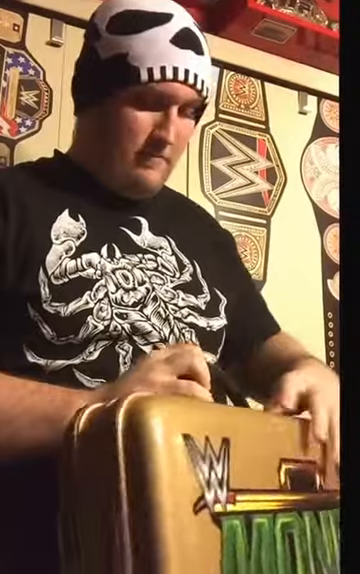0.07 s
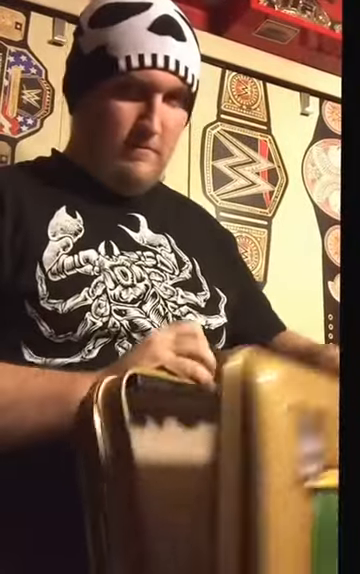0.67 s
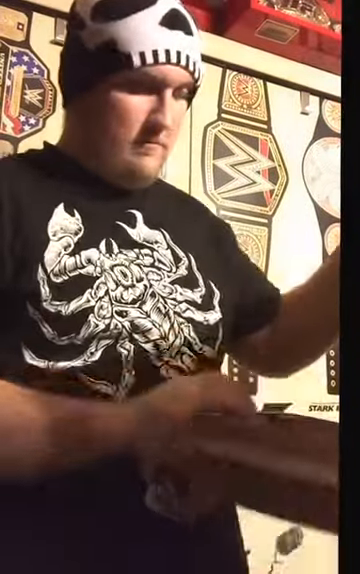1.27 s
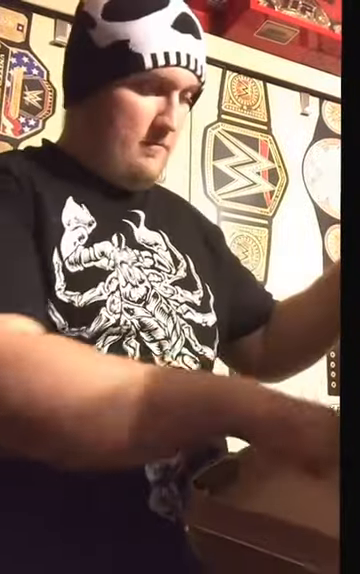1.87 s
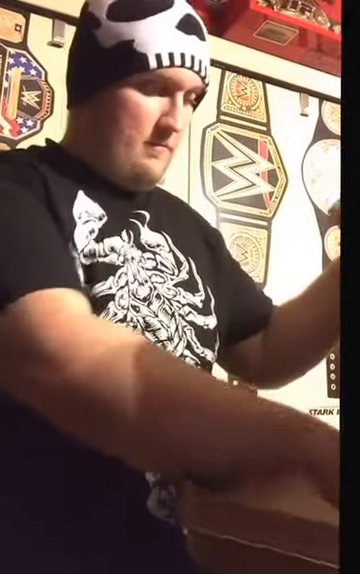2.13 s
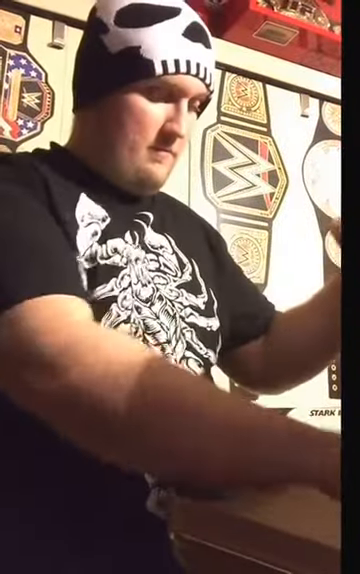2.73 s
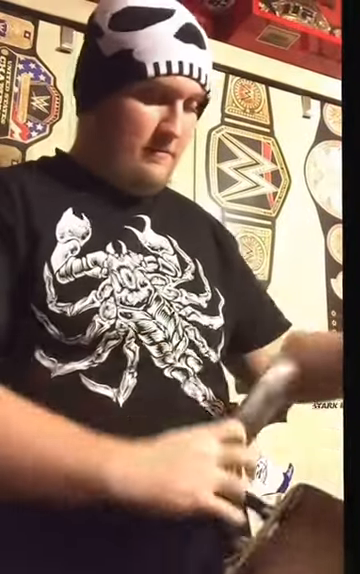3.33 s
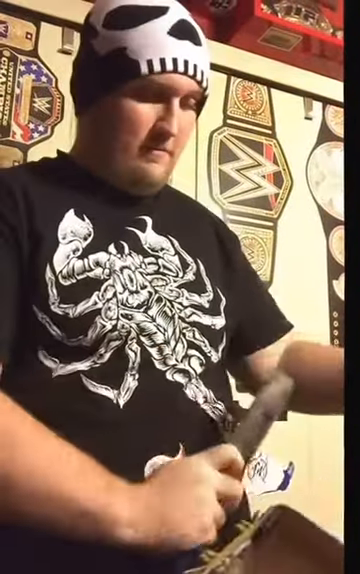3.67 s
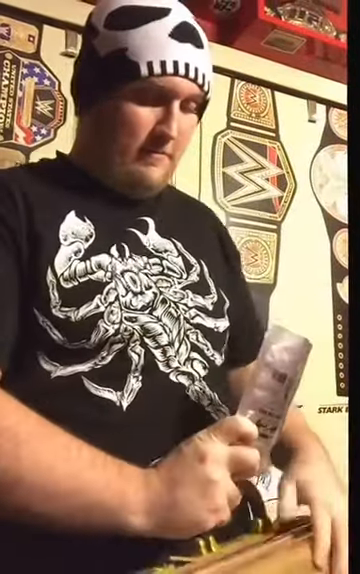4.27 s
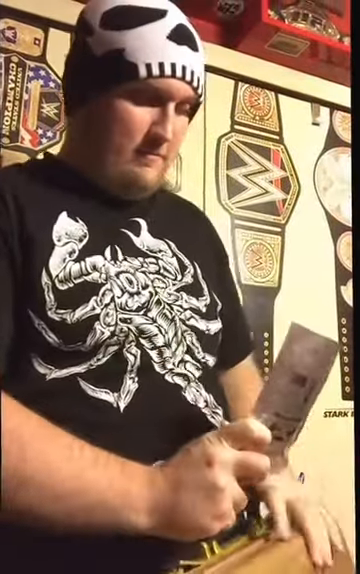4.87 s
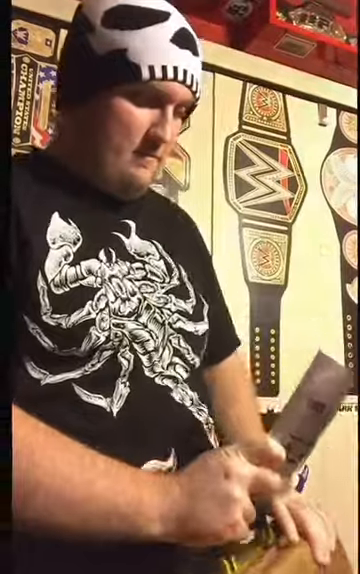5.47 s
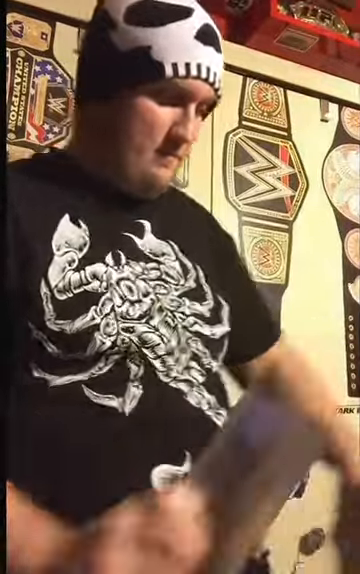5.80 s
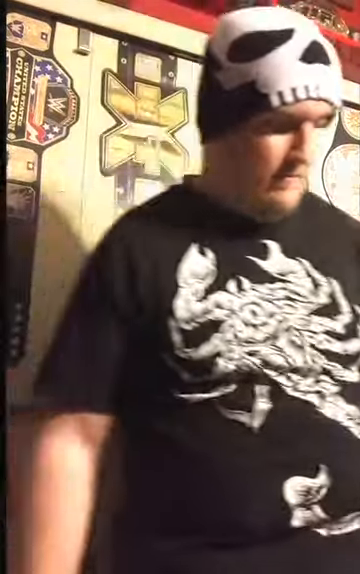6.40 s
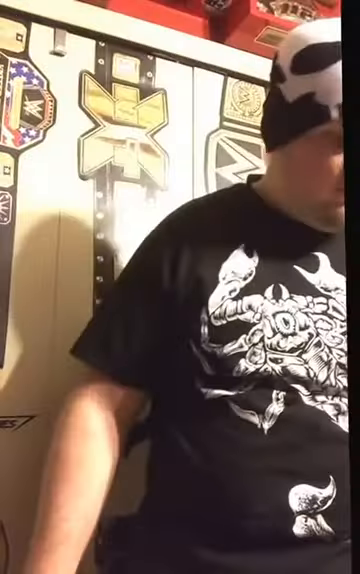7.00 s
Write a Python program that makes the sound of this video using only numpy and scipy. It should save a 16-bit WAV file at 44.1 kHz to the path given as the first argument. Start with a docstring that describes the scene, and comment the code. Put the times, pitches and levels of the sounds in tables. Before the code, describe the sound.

A hard briefcase is opened and a package scrapes out, followed by hollow knocks and sharp latch snaps in a quiet room.

```python
"""Unpacking a hard briefcase

A small, quiet room, heard from close by on a small microphone with little bass. The case is opened,
a boxed package slides out, the lid is shut, two latches snap home and the case is moved away.
Blows ring the hollow shell (thump) and its flat panels (clack). Friction makes the package scrape,
its edges tick as they catch and let go, and fast stick-slip gives thin squeaks."""
import sys
import numpy as np
from scipy import signal
from scipy.io import wavfile
from scipy.ndimage import uniform_filter1d

SR = 44100
rng = np.random.default_rng(int(sys.argv[2]) if len(sys.argv) > 2 else 0)


def transcribe(signal):
    """Save signal, clipped to [-1, 1], as a 16-bit WAV file at the path in sys.argv[1]."""
    frames = np.atleast_2d(signal).T
    limited = np.clip(frames, -1, 1)
    pcm = np.round(limited * 32767).astype(np.int16)
    wavfile.write(sys.argv[1], SR, pcm)


N = 310023
T = np.arange(N) / SR
RING_T = np.arange(12000) / SR  # seconds since a contact

# Hard knocks on the case, each led by a lighter touch whose levels are relative to the knock:
# start_s, thump_db, thump_hz, focus_db_per_octave, clack_db, clack_hz, snap_db,
# lead_s, touch_thump_db, touch_clack_db
KNOCKS = [(0.0005, -19.5, 315, 22, -29.5, 1020, -51.5, 0.012, -33.5, -22),
          (1.5, -38, 297, 19, -39.5, 2020, -48.5, 0.012, -2, -8),
          (2.483, -72, 320, 12, -42, 1700, -46, 0, -12, -8),
          (3.534, -45.5, 217, 9.6, -40, 1170, -73, .03, -1, -3),
          (3.9893, -19.5, 242, 24.5, -31.5, 1640, -39, .034, -25, -21),
          (4.2093, -17.5, 308, 21, -21.5, 1350, -41, 0.02, -9, -24),
          (5.1599, -11, 286.5, 9.3, -17.5, 1050, -26.5, .015, -16, -13),
          (5.703, -27.5, 472, 11.6, -30.5, 1300, -44.5, 0.0064, -4, -3),
          (6.572, -38.5, 330, 14, -51, 950, -62, 0.025, -30, -10)]
# Soft landings on the shell: start_s, thump_db, thump_hz, clack_db
BUMPS = [(.164, -58, 310, -64.5), (.213, -53.5, 330, -56), (.325, -57.5, 340, -59.5),
         (.564, -53.5, 308, -55.5), (3.785, -56, 290, -64), (4.142, -31, 330, -44.5),
         (4.483, -59.5, 224, -86), (4.596, -30, 243, -46.5), (4.62, -43.5, 234, -72),
         (4.749, -50, 240, -62), (4.805, -49.5, 270, -61), (4.894, -51.5, 254, -62),
         (4.931, -45.5, 250, -51), (4.944, -41, 248, -62), (5.177, -21.5, 150, -33.5),
         (5.859, -53, 290, -58.5), (6.175, -50, 271, -63), (6.242, -44, 334, -55.5),
         (6.641, -51, 407, -59.5), (6.791, -62, 360, -62.5)]
# Low modes of the shell; the lowest swell slowly with the room's air: pitch_hz, level_db, t60_s, rise_s
SHELL_MODES = [(135, -2, .16, .012), (152, -3, .19, .01), (181, -9, .12, .004), (214, -4, .18, .004),
               (245, -1, .18, .002), (264, 0, .16, .002), (301, 2, .14, .001), (338, -4, .13, .001),
               (368, -7, .14, .001), (430, -1, .14, .001), (479, -3, .14, .001), (532, -10, .14, .001),
               (590, -10, .12, .001)]
# Higher modes of the panels: pitch_hz, level_db
PANEL_MODES = [(663, -1), (757, 0), (885, -2), (975, -4), (1028, -1), (1342, -5), (1405, -4), (1472, -1),
               (1543, 2), (1680, -3), (1812, -4), (2002, -5), (2300, -4), (2785, -7)]
# Hum of the open lid: start_s, pitch_hz, level_db, t60_s
LID_MODE = (1.508, 151, -40, .56)
# Sliding strokes: fastest_s, rise_s, fall_s, scrape_gain_db, fizz_gain_db
STROKES = [(.82, .35, 0.19, -59.5, -67), (1.6, 0.1, 0.14, -69, -67), (1.85, 0.076, 0.11, -55.5, -61.5),
           (2.05, 0.032, 0.11, -56, -56), (2.127, 0.033, 0.055, -47.5, -57),
           (2.349, .06, 0.062, -44.5, -51.5), (2.46, 0.077, 0.049, -39, -42),
           (2.555, .012, 0.022, -35.5, -53), (2.97, 0.34, 0.078, -57, -59),
           (3.16, 0.073, 0.074, -52, -54.5), (3.35, 0.062, 0.068, -52, -62.5),
           (3.493, 0.046, 0.014, -48.5, -52), (3.85, 0.19, 0.31, -56.5, -69), (4.25, .04, 0.079, -57, -69),
           (4.72, 0.24, 0.61, -67, -68.5), (6.07, 0.35, 0.38, -59, -66.5), (6.6, 0.031, 0.043, -55.5, -65)]
# Short rubs that sound one hollow resonance: middle_s, length_s, level_db, pitch_hz, width_hz
SCUFFS = [(0.142, 0.096, -58, 1600, 300), (0.512, 0.055, -45.5, 1840, 346), (0.55, .065, -56, 1760, 500),
          (0.818, 0.057, -56, 2270, 1410), (1.863, .25, -65, 2680, 600), (2.1, 0.21, -63, 1040, 250),
          (2.382, 0.32, -45.5, 1890, 375), (3.155, 0.11, -47, 3170, 700), (2.433, .2, -65, 6000, 3000),
          (2.509, 0.067, -42, 3050, 250), (4.18, 0.14, -46, 1200, 1400), (6.746, 0.048, -61, 2150, 297),
          (6.85, .084, -56, 1400, 692)]
# Light clicks of packaging and fittings: start_s, clack_db, snap_db, contact_s
CLICKS = [(0.21, -53.5, -49.5, 0.0012), (.303, -53, -76, .0003), (0.498, -50.5, -60, 0.0048),
          (1.004, -59, -66, 0.0025), (1.4327, -50.5, -52, 0.0032), (1.477, -43.5, -67, .0006),
          (1.554, -52, -58.5, 0.0051), (1.616, -47.5, -63, 0.00044), (2.505, -57, -40.5, 0.0024),
          (2.55, -42.5, -41.5, 0.0012), (2.831, -45, -76, .001), (2.909, -44, -62, 0.00073),
          (2.916, -41, -63, 0.00037), (2.958, -49.5, -58, 0.0032), (2.972, -44.5, -59, .002),
          (3.096, -45.5, -55.5, 0.0002), (3.14, -45, -48, 0.0014), (3.179, -42, -50, 0.0012),
          (3.294, -43.5, -55, .0003), (3.3403, -50, -53, 0.00047), (3.4017, -43.5, -44.5, 0.00014),
          (4.661, -54.5, -72, 0.00089), (5.254, -50, -53, 0.0019), (6.067, -73, -55, 0.0028),
          (6.308, -54.5, -71, 0.0018)]
# Squeaks and thin whistles: start_s, length_s, start_hz, end_hz, level_db
SQUEAKS = [(1.715, .1, 11500, 13000, -73), (1.933, .09, 11900, 11200, -72), (2.463, .06, 2350, 3150, -42),
           (3.81, .16, 12900, 13900, -72), (3.97, .04, 14000, 13700, -54), (4.005, .06, 13500, 13950, -68),
           (4.04, .06, 11700, 12400, -74.5), (4.15, .06, 12800, 11950, -71), (4.25, .06, 15300, 13900, -71),
           (6.732, .009, 2050, 2140, -45.5)]
# Spectra of the panels' crack and the snap at the point of contact: frequency_hz, relative_db
CLACK_SPECTRUM = [(100, -34), (300, 13), (600, 3), (950, -2), (1150, -7), (1500, -3), (2300, -7),
                  (3100, -7.5), (3900, -10), (4600, -20), (8000, -14.5)]
SNAP_SPECTRUM = [(300, -24), (2500, -1), (4000, -0.5), (4700, -3.5), (5800, -1), (8000, -5.5), (11000, -3),
                 (13500, -13), (16000, -22)]
# Spectra of the midrange scrape and the treble fizz of sliding: frequency_hz, relative_db
SCRAPE_SPECTRUM = [(80, -32.5), (170, -20.5), (350, -1), (850, -0.5), (1100, -1.5), (1450, 3), (1950, 1.5),
                   (2250, 1.5), (2900, 3), (3700, -2.5), (5000, -22), (9000, -47)]
FIZZ_SPECTRUM = [(500, -21.5), (2500, -11), (4000, 0), (4800, 2.5), (6200, 4), (8000, 2.5), (10500, 1.5),
                 (13000, -2), (16000, -7)]
# Spectrum of the room tone: frequency_hz, relative_db
ROOM_SPECTRUM = [(18, -46), (30, -14), (108, -2.5), (232, -3.5), (551, -21), (628, -13), (816, -15),
                 (3450, -20), (4370, -24.5), (6480, -26), (11200, -24), (15800, -35.5)]

HARD_CONTACT_S, SOFT_CONTACT_S = 0.00021, 0.0057
REBOUND_S, REBOUND_DB = 0.0113, -12  # the walls strike once more after a hard knock
CRINKLE_START_S, CRINKLE_END_S, CRINKLES_PER_S = 2.92, 3.45, 42
RESTING_SCRAPE_DB, RESTING_FIZZ_DB = -72, -75  # sleeves and hands never lie quite still
GRIP_DB, GRIP_RUB_DB, GRIP_PRESS_DB = -71.5, -40, -48
RUB_FOLLOW, PRESS_FOLLOW = 0.5, 0.25  # dB of murmur per dB of stroke, and per dB of bump
ROOM_DB = -65.5
MIC_LOW_HZ, MIC_HIGH_HZ = 118, 15900


def knocks():
    """One edge touches first, then the blow lands in full and rebounds."""
    out = np.zeros(N)
    for s, thump_db, thump_hz, focus_db, clack_db, clack_hz, snap_db, *touch in KNOCKS:
        lead_s, touch_thump_db, touch_clack_db = touch
        add(out, s - lead_s, thump(thump_db + touch_thump_db, thump_hz, focus_db, SOFT_CONTACT_S))
        add(out, s - lead_s, amp(touch_clack_db) * clack(clack_db, clack_hz, snap_db, SOFT_CONTACT_S))
        add(out, s, thump(thump_db, thump_hz, focus_db, HARD_CONTACT_S))
        add(out, s, clack(clack_db, clack_hz, snap_db, HARD_CONTACT_S))
        add(out, s + REBOUND_S, amp(REBOUND_DB) * clack(clack_db, clack_hz, snap_db, HARD_CONTACT_S))
    return out


def bumps():
    """Hands land on the shell or the case settles: mostly thump, little snap."""
    out = np.zeros(N)
    for s, thump_db, thump_hz, clack_db in BUMPS:
        add(out, s, thump(thump_db, thump_hz, focus_db=34.5, contact_s=SOFT_CONTACT_S))
        add(out, s, clack(clack_db, centre_hz=1060, snap_db=clack_db - 18.5, contact_s=SOFT_CONTACT_S))
    return out


def thump(db, centre_hz, focus_db, contact_s):
    """The low modes of the shell answer a blow."""
    shell = ring(SHELL_MODES, centre_hz, focus_db, spread_db=2, scatter_rad=0.76)
    return amp(db) * unit_rms(shell * pressing(contact_s + 0.00061), size=880)


def clack(clack_db, centre_hz, snap_db, contact_s):
    """The panels crack and ring, and the point of contact snaps."""
    walls = panels(centre_hz, focus_db=1) * pressing(contact_s)
    impact = burst(contact_s, crack_s=0.003, tail_db=-9, t60_s=0.13)
    crack = coloured(impact, CLACK_SPECTRUM, centre_hz, focus_db=7.5)
    snap = coloured(burst(contact_s, crack_s=0.0007, tail_db=-13.5, t60_s=0.14), SNAP_SPECTRUM)
    body = unit_rms(crack, size=530) + amp(-8) * unit_rms(walls, size=530)
    return amp(clack_db) * body + amp(snap_db) * unit_rms(snap, size=530)


def panels(centre_hz, focus_db, t60_s=0.14):
    """The flat walls of the case answer at once and die together."""
    modes = [(hz, db, t60_s, 1 / SR) for hz, db in PANEL_MODES]
    return ring(modes, centre_hz, focus_db, spread_db=1.5, scatter_rad=1.8)


def lid(rise_s=0.0031):
    """The lowest mode of the free lid keeps humming after it falls open."""
    s, hz, db, t60_s = LID_MODE
    t = np.maximum(T - s, 0)
    level = amp(db - 60 * t / t60_s) * (1 - np.exp(-t / rise_s))
    return level * np.sin(2 * np.pi * hz * t)


def ring(modes, centre_hz, focus_db, spread_db, scatter_rad):
    """Modes swell and die; every blow gives them slightly different levels and phases."""
    hz, db, t60_s, rise_s = np.transpose(modes)[:, :, None]
    weight, phase = rng.standard_normal((2, len(hz), 1))
    struck_db = db + favour(hz, centre_hz, focus_db) + spread_db * weight
    level = amp(struck_db - 60 * RING_T / t60_s) * (1 - np.exp(-RING_T / rise_s))
    return (level * np.sin(2 * np.pi * hz * RING_T + scatter_rad * phase)).sum(0)


def favour(hz, centre_hz, focus_db):
    """Place and hardness of a contact favour one frequency; far from it, focus_db is lost per octave."""
    octaves = np.log2((hz + 20) / centre_hz)
    return -focus_db * (np.sqrt(octaves ** 2 + 0.11) - 0.5)


def burst(contact_s, crack_s, tail_db, t60_s):
    """A crack that lengthens with the contact, then the reflections of the room dying away."""
    crack = np.exp(-RING_T / (crack_s + contact_s))
    tail = amp(tail_db - 60 * RING_T / t60_s)
    return rng.standard_normal(len(RING_T)) * np.hypot(crack, tail) * pressing(contact_s)


def pressing(contact_s):
    """The force builds up over the time of contact."""
    return 1 - np.exp(-(RING_T / contact_s) ** 2)


def rubbing(scrape_gain, fizz_gain):
    """Package, lining and sleeves slide over one another, and the walls of the case ring along."""
    friction = shifting(slips(per_s=2500, spread_db=1, hiss=0.64), patchy_db=4)
    hollow = unit_rms(signal.oaconvolve(friction, panels(centre_hz=1700, focus_db=3))[:N])
    scrape = 0.66 * unit_rms(coloured(friction, SCRAPE_SPECTRUM)) + 0.16 * hollow
    fizz = unit_rms(coloured(friction, FIZZ_SPECTRUM))
    return scrape_gain * scrape + fizz_gain * fizz


def stroke_gains():
    """Gains of scrape and fizz over time: all strokes on top of the resting contact."""
    scrape, fizz = amp(RESTING_SCRAPE_DB), amp(RESTING_FIZZ_DB)
    for s, rise_s, fall_s, scrape_db, fizz_db in STROKES:
        speed = swell(s, rise_s, fall_s)
        scrape = np.hypot(scrape, amp(scrape_db) * speed)
        fizz = np.hypot(fizz, amp(fizz_db) * speed)
    return scrape, fizz


def swell(s, rise_s, fall_s):
    """A movement gathers speed up to time s, then slows to rest."""
    return np.exp(-((T - s) / np.where(T < s, rise_s, fall_s)) ** 2)


def slips(per_s, spread_db, hiss):
    """Friction: a hail of tiny slips of uneven size over a smooth hiss."""
    size = amp(spread_db * np.minimum(rng.exponential(1, N), 3.5))
    grains = size * rng.choice([-1, 1], N) * (rng.random(N) < per_s / SR)
    return unit_rms(grains) + hiss * rng.standard_normal(N)


def shifting(friction, patchy_db):
    """As the contact travels, patches of its spectrum come and go."""
    spectra = signal.stft(friction, nperseg=512)[2]
    bands = uniform_filter1d(rng.standard_normal(spectra.shape), size=7, axis=0)
    patches = unit_rms(uniform_filter1d(bands, size=7, axis=1))
    return signal.istft(spectra * amp(patchy_db * patches), nperseg=512)[1][:N]


def scuffs():
    """Slips under one stroke pass the resonance of the panel or box that is rubbed."""
    out = np.zeros(N)
    friction = slips(per_s=1500, spread_db=2.5, hiss=0.5)
    for middle_s, length_s, db, hz, width_hz in SCUFFS:
        start_s = middle_s - length_s / 2
        stroke = signal.windows.hann(int(length_s * SR))
        drive = friction[max(int(start_s * SR), 0):][:len(stroke)]
        resonance = signal.iirpeak(hz, hz / width_hz, SR)
        hollow = signal.lfilter(*resonance, coloured(drive, CLACK_SPECTRUM))
        add(out, start_s, amp(db) * unit_rms(hollow) * stroke[:len(hollow)])
    return out


def clicks(spread_db=3):
    """Packaging and fittings click, and the package crinkles faintly as it is lifted out."""
    out = np.zeros(N)
    for s, clack_db, snap_db, contact_s in CLICKS:
        add(out, s, tick(clack_db, snap_db, contact_s))
    for s in np.arange(CRINKLE_START_S, CRINKLE_END_S, 1 / CRINKLES_PER_S):
        late_s = rng.random() / CRINKLES_PER_S
        size = amp(spread_db * rng.standard_normal())
        add(out, s + late_s, size * tick(clack_db=-55.5, snap_db=-58.5, contact_s=HARD_CONTACT_S))
    return out


def tick(clack_db, snap_db, contact_s):
    """An edge of card or plastic catches and lets go; too light to move the shell."""
    release = burst(contact_s, crack_s=0.0012, tail_db=-15, t60_s=0.22)
    body = coloured(release, CLACK_SPECTRUM, centre_hz=1630, focus_db=9)
    snap = coloured(burst(contact_s, crack_s=0.00053, tail_db=-15, t60_s=0.15), SNAP_SPECTRUM)
    return amp(clack_db) * unit_rms(body, size=220) + amp(snap_db) * unit_rms(snap, size=440)


def squeaks(waver=0.006, flutter_db=4):
    """Fast stick-slip: thin, broken whistles that glide, swell and fade."""
    out = np.zeros(N)
    for s, length_s, start_hz, end_hz, db in SQUEAKS:
        progress = np.linspace(0, 1, int(length_s * SR))
        wobble, catch = rng.standard_normal((2, len(progress)))
        glide_hz = end_hz + (start_hz - end_hz) * (1 - progress) ** 1.7  # fast at first, then settling
        pitch_hz = glide_hz * (1 + waver * unit_rms(uniform_filter1d(wobble, size=40)))
        flutter = amp(flutter_db * unit_rms(uniform_filter1d(catch, size=300)))
        level = amp(db) * unit_rms(np.sin(np.pi * progress) * flutter)
        add(out, s, level * np.sin(2 * np.pi * np.cumsum(pitch_hz) / SR))
    return out


def grip(scrape_gain):
    """Shifting fingers keep the shell faintly ringing, more so in a stroke and around each bump."""
    shell = ring(SHELL_MODES, centre_hz=260, focus_db=1, spread_db=1, scatter_rad=0.58)
    fingers = slips(per_s=200, spread_db=2, hiss=0.8)
    murmur = signal.oaconvolve(fingers, shell)[:N]
    presses = [amp(PRESS_FOLLOW * db) * swell(s, rise_s=0.03, fall_s=0.11) for s, db, _, _ in BUMPS]
    press = amp(GRIP_PRESS_DB) * np.max(presses, axis=0)
    rub = amp(GRIP_RUB_DB) * scrape_gain ** RUB_FOLLOW
    return np.hypot(amp(GRIP_DB), np.hypot(rub, press)) * unit_rms(murmur)


def room_tone():
    """The steady, low hush of the small room."""
    return amp(ROOM_DB) * unit_rms(coloured(rng.standard_normal(N), ROOM_SPECTRUM))


def coloured(x, spectrum, centre_hz=1000, focus_db=0):
    """Minimum-phase filter with the given spectrum, optionally focused around centre_hz."""
    hz = abs(np.fft.fftfreq(4096, 1 / SR))
    point_hz, point_db = np.transpose(spectrum)
    db = np.interp(np.log(hz + 1), np.log(point_hz), point_db) + favour(hz, centre_hz, focus_db)
    log_gain = np.log(amp(np.maximum(db, -90)))
    response = np.exp(np.conj(signal.hilbert(log_gain)))
    taps = np.fft.ifft(response).real[:len(hz) // 2]
    return signal.oaconvolve(x, taps)[:len(x)]


def amp(db):
    """Decibels to gain."""
    return 10 ** (np.asarray(db) / 20)


def unit_rms(x, size=None):
    """Scales to unit rms over the first size samples, or over all of them."""
    return x / np.sqrt(np.mean(x[:size] ** 2) + 1e-20)


def add(mix, s, sound):
    """Mixes a sound in at time s."""
    part = mix[max(round(s * SR), 0):][:len(sound)]
    part += sound[:len(part)]


def scene():
    """The handling of the case in front, room tone behind, in mono."""
    room = room_tone()
    scrape_gain, fizz_gain = stroke_gains()
    blows = knocks() + bumps() + lid()
    friction = rubbing(scrape_gain, fizz_gain) + grip(scrape_gain) + scuffs()
    return (blows + friction + clicks() + squeaks() + room)[None]


def record(dry):
    """A small microphone that sheds nearly all the bass, then a cut of the highest treble."""
    low_cut = signal.butter(8, MIC_LOW_HZ, "high", fs=SR, output="sos")
    thin = signal.sosfilt(low_cut, dry) + amp(-27) * dry  # a trace of bass gets through
    high_cut = signal.firwin(511, MIC_HIGH_HZ, window=("kaiser", 9), fs=SR)
    return signal.oaconvolve(thin, high_cut[None], "same")


dry = scene()
out = record(dry)
transcribe(out)
```